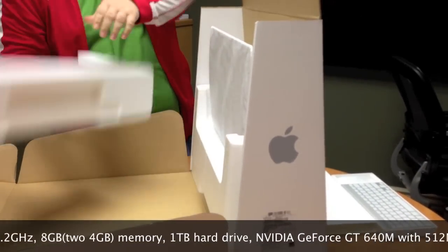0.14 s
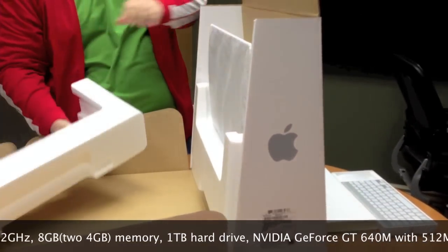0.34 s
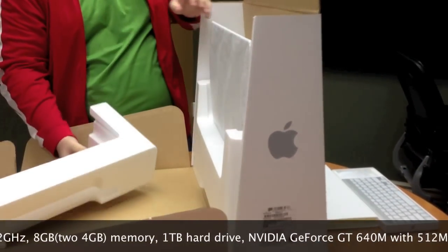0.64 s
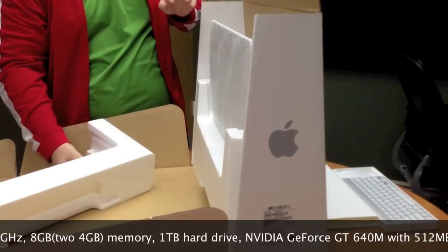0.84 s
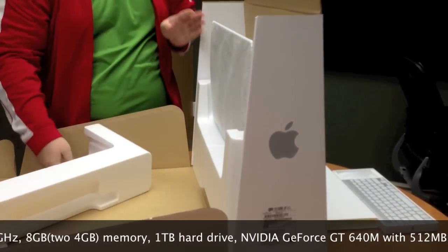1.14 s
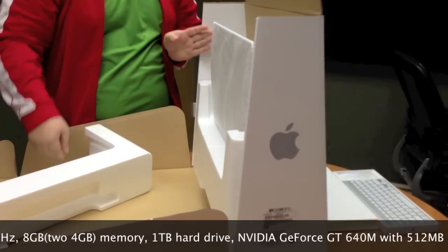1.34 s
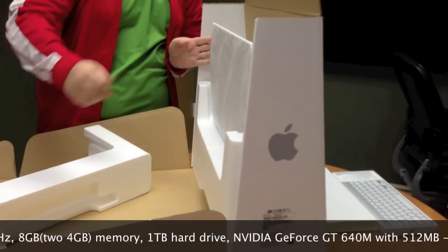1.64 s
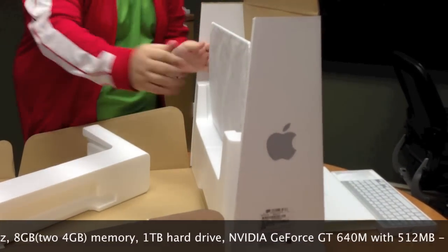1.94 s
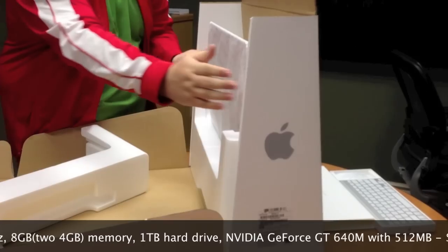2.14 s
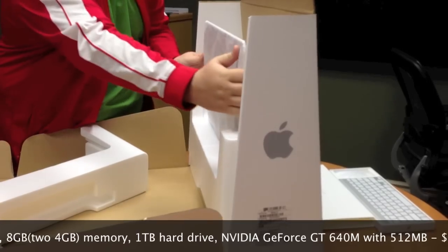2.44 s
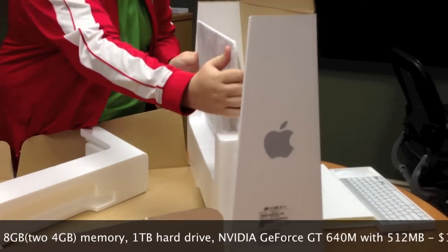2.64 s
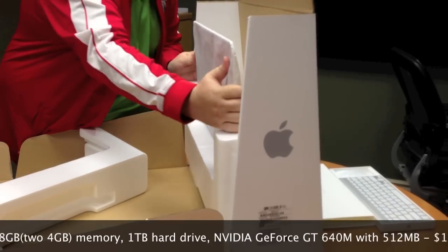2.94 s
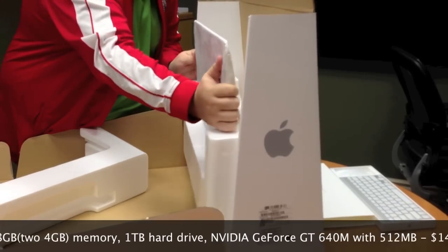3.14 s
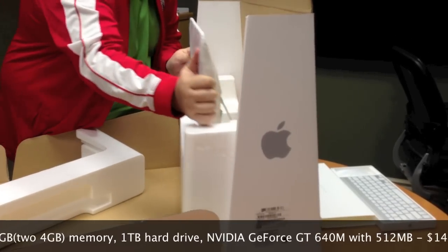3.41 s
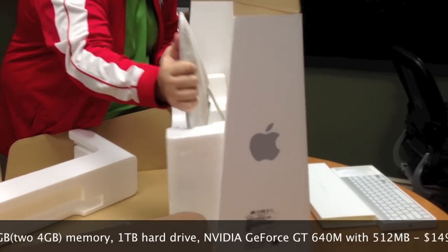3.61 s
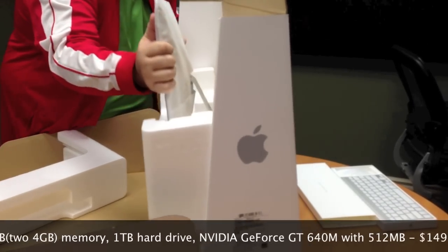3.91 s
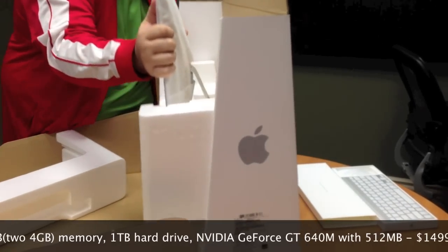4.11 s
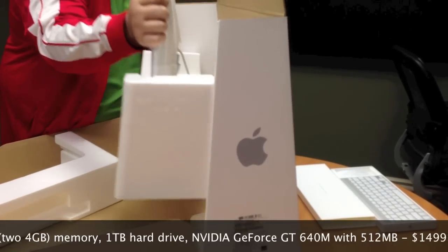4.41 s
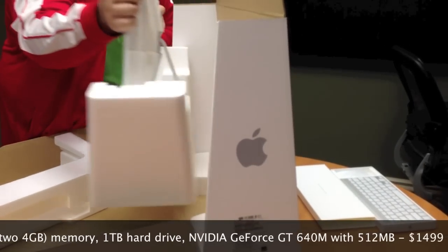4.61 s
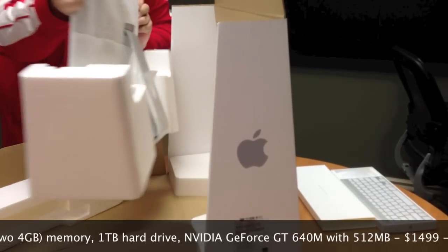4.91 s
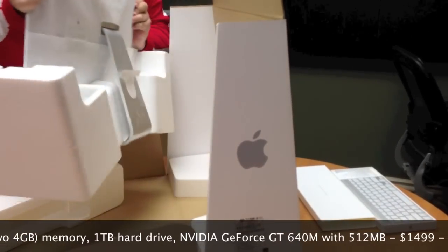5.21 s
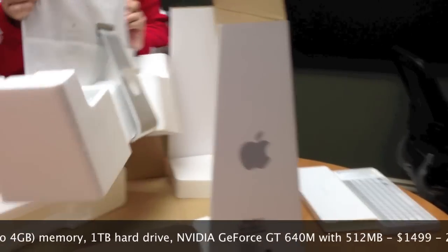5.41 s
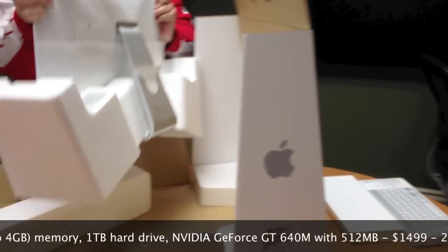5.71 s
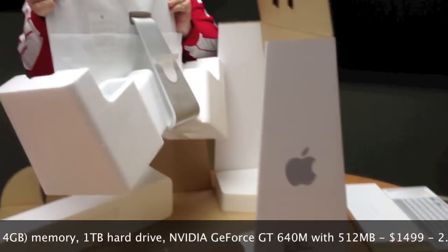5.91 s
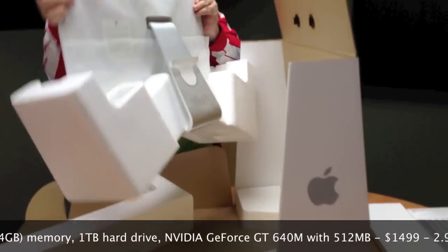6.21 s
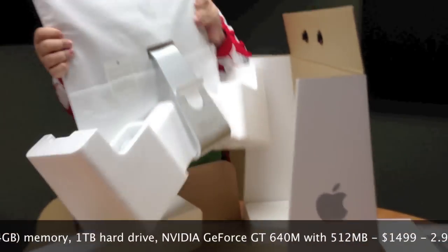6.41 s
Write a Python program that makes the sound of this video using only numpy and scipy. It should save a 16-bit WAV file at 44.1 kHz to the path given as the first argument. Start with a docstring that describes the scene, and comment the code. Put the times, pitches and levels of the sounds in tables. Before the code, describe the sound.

In a quiet room, a foam block drops onto cardboard with a few hollow knocks. Light rubs and small ticks of wrapping follow, then one loud bump on the carton. Foam packing slides out along the box wall in a long, grainy hiss with faint squeaks and sudden jerks. Shorter scrapes and soft bumps finish the unpacking. The sound is fairly close, with little echo.

```python
"""Foam slides along a carton wall: a dense hiss of tiny slips, with faint squeaks and a few sudden jerks.
A heavy object is being unpacked on a table in a quiet room, in short rubs and one long pull.
Foam blocks drop on the cardboard and bump the carton, ringing its hollow modes,
and the foam and a wrapping sheet tick. A short room tail and a steady hush sit behind it all."""
import sys
import numpy as np
from scipy import signal
from scipy.fft import rfft, irfft, next_fast_len
from scipy.io import wavfile
from scipy.ndimage import uniform_filter1d, map_coordinates

SR = 44100
rng = np.random.default_rng(int(sys.argv[2]) if len(sys.argv) > 2 else 0)


def persist_wave(psi):
    """Save psi, clipped to +-1, as 16-bit WAV."""
    counts = np.round(np.clip(psi, -1, 1) * 32767).astype(np.int16)
    wavfile.write(sys.argv[1], SR, np.atleast_2d(counts).T)


N = 288855


def amp(db):
    """Gain of a level in dB."""
    return 10 ** (np.asarray(db) / 20)


def unit(x):
    """x at rms 1."""
    return x / np.sqrt(np.mean(x ** 2) + 1e-20)


def along(points, hz):
    """Read a curve of (frequency, value) points on a log frequency axis."""
    point_hz, values = np.transpose(points)
    return np.interp(np.log(hz + 1), np.log(point_hz + 1), values)


def wobble(rate):
    """A smooth random modulator, rate knots a second."""
    knots = rng.standard_normal(int(N * rate / SR) + 4)
    return map_coordinates(knots, [np.arange(N) * rate / SR])


def filtered(x, response):
    """x through an EQ given as complex gain against frequency."""
    size = next_fast_len(len(x) + SR // 4)
    return irfft(rfft(x, size) * response(np.fft.rfftfreq(size, 1 / SR)), size)[:len(x)]


def lowpass(x, cutoff_hz, order):
    """Roll off the top end without shifting phase."""
    return filtered(x, lambda hz: 1 / (1 + (hz / cutoff_hz) ** order))


def resonances(modes):
    """Response of a resonator bank of alternating polarity: (pitch [Hz], width [Hz], level [dB])."""
    return lambda hz: sum((-1) ** k * amp(db) * 1j * hz * width / (pitch**2 - hz**2 + 1j * hz * width)
                          for k, (pitch, width, db) in enumerate(modes))


# Tone of the hush: (frequency [Hz], relative level [dB])
HUSH_EQ = [(15, -68), (25, -17), (64, -26), (152, 1), (246, -2), (537, -6), (804, -3), (1050, -5.5),
           (4500, -10.5), (13600, -9.5), (15500, -11)]
def hush(level_db=-68.5):
    """The bed: steady noise of the room and the microphone."""
    return amp(level_db) * unit(filtered(rng.standard_normal(N), lambda hz: amp(along(HUSH_EQ, hz))))


# Reverb time of the room: (frequency [Hz], t60 [s])
ROOM_DECAY = [(150, 0.78), (600, 0.25), (3000, 0.085), (12000, 0.33)]
def room(x):
    """The room's tail after a short pre-delay; each frequency dies at its own speed."""
    hz, t, spectrum = signal.stft(rng.standard_normal(SR // 2), SR, nperseg=256)
    decay = amp(-60 * t / along(ROOM_DECAY, hz)[:, None])
    tail = signal.istft(spectrum * decay, SR, nperseg=256)[1]
    return signal.fftconvolve(np.pad(x, (200, 0)), tail / np.linalg.norm(tail))[:N]


# Ticks of foam and wrapping: (time [s], peak before the low-pass [dB], pitch [Hz], t60 [s])
WRAPPING_TICKS = [(.384, -24, 4700, 0.046), (0.5536, -58, 4473, 0.06), (0.5856, -42, 5390, 0.06),
                  (0.7015, -54, 4120, 0.06), (0.9682, -41.5, 3300, 0.073), (1.0825, -34.5, 6200, 0.098),
                  (1.836, -33.5, 7300, 0.071), (1.3299, -57, 2130, 0.066), (1.497, -51.5, 5740, 0.06),
                  (1.507, -40.5, 2170, 0.055), (1.6033, -51, 3420, 0.06), (1.6392, -58, 5850, 0.06),
                  (1.7272, -47.5, 2190, 0.15), (1.836, -31, 3800, 0.1), (1.944, -55, 2090, 0.066),
                  (2.0359, -45, 2040, 0.041), (2.0857, -47, 3100, 0.079), (2.1779, -53, 3750, 0.06),
                  (3.489, -23, 5450, .04), (3.593, -24, 4660, 0.052), (3.684, -30.5, 4670, 0.06)]
def ticks():
    """Each tick is a snap ringing briefly at its own pitch over a broad click."""
    out, t = np.zeros(N + SR), np.arange(SR // 4) / SR
    for start, db, hz, t60 in WRAPPING_TICKS:
        force = rng.standard_normal(len(t)) * (amp(-60 * t / 0.012) + 0.38 * amp(-60 * t / t60))
        snap = filtered(force, resonances([(hz, 0.11 * hz, 0), (4500, 5000, -14)]))
        out[round(start * SR):][:len(t)] += amp(db) * snap / np.abs(snap).max()
    return lowpass(out[:N], cutoff_hz=8170, order=12)  # the wrapping sounds dull above this


# Hollow body of the carton: (pitch [Hz], width [Hz], relative level [dB])
CARTON_MODES = [(168, 24, 2), (243.8, 34, 5.5), (361.4, 105, 2.5), (432, 62, 4), (548, 43, 1), (680, 49, 3),
                (890, 350, 0.5), (1430, 250, -3), (1945, 400, -42.5)]
# Tone of the contact crack: (frequency [Hz], relative level [dB])
CRACK_EQ = [(600, -9.5), (1500, 8), (3000, 2), (5000, 3.5), (9000, -14.5), (15000, -39.5)]
# Blows on the carton: (time [s], body peak [dB], crack over body [dB], rattle t60 [s],
# hardness [dB/octave], pitch favoured by the spot struck [Hz], rattle over blow [dB])
CARTON_KNOCKS = [(0.3802, -21.5, -12, 0.23, -4, 730, -9), (0.4164, -28.5, -6, 0.23, -8, 800, -12.5),
                 (.449, -35.5, -20, 0.26, -7.5, 280, -15), (0.505, -35.5, -17, 0.32, -8, 395, -13),
                 (.534, -43.5, -29, 0.22, -8, 330, -8), (0.617, -42.5, -14, 0.27, -11, 252, -8),
                 (0.8017, -27.5, -4, 0.31, 0, 392, -5), (0.85, -41, -2.5, 0.2, -16, 400, -2),
                 (.942, -50.5, -23, 0.22, -8, 450, -6), (.968, -47, -5.5, 0.24, -5, 310, -3),
                 (1.132, -47, -15, 0.15, -8, 378, -5), (2.397, -57.5, -12.5, 0.93, -4, 550, -1),
                 (2.867, -55, -26, 0.57, -0.5, 397, -10), (2.939, -15.5, -21, 0.27, -2, 587, -13.5),
                 (3.502, -48, -11.5, 0.26, -18, 245, -6), (3.712, -47.5, -25, 0.34, -9, 195, -3),
                 (4.977, -48.5, -21, 0.36, -3.5, 168, -3), (5.358, -50.5, -20, 0.32, 4.5, 407, -3),
                 (5.506, -41.5, -12, 0.38, -1, 190, -4), (5.622, -49, -18, 0.26, -3, 250, -10)]
def knocks():
    """A blow and its rattle ring the carton, hard blows brighter; a brief crack marks the contact."""
    out, t = np.zeros(N + SR), np.arange(SR // 2) / SR
    mode_hz, width, mode_db = np.transpose(CARTON_MODES)
    for start, db, crack_db, t60, hardness, spot_hz, rattle_db in CARTON_KNOCKS:
        body_noise, crack_noise = rng.standard_normal((2, len(t)))
        blow = amp(-60 * t / 0.021)
        rattle = amp(rattle_db - 60 * t / t60)
        # modes that bulge under the blow ring most
        spot_db = 11 * np.exp(-(np.log2(mode_hz / spot_hz) / 0.54) ** 2)
        struck_db = mode_db + hardness * np.log2(mode_hz / 400) + spot_db
        carton = resonances(np.transpose([mode_hz, width, struck_db]))
        body = filtered(body_noise * (blow + rattle), carton)
        crack = unit(filtered(crack_noise, lambda hz: amp(along(CRACK_EQ, hz))))
        crack *= amp(-60 * t / 0.024) + 0.26 * amp(-60 * t / (0.74 * t60))
        out[round(start * SR):][:len(t)] += amp(db) * (body / np.abs(body).max() + amp(crack_db) * crack)
    return out[:N]


def slip_tone(length, first_hz, last_hz, smear_hz):
    """A swelling tone that glides with the slip rate; uneven slips blur its pitch."""
    progress = np.arange(round(length * SR)) / (length * SR)
    uneven = lowpass(rng.standard_normal(SR // 2), smear_hz, order=2)[:len(progress)]
    phase = 2 * np.pi * np.cumsum(first_hz + (last_hz - first_hz) * progress) / SR
    return np.sin(np.pi * progress) ** 0.26 * np.sin(phase) * unit(uneven)


# Foam squeaks: (time [s], length [s], start pitch [Hz], end pitch [Hz], level [dB])
FOAM_SQUEAKS = [(0.025, 0.26, 1710, 1675, -64.5), (1.497, 0.029, 840, 838, -62),
                (1.79, 0.052, 2240, 2170, -55.5), (2.544, 0.17, 697, 688, -65),
                (3.24, 0.09, 2240, 2200, -54), (3.304, 0.17, 5870, 5660, -43),
                (3.246, 0.33, 4350, 4200, -48.5), (3.702, 0.21, 4540, 4550, -51),
                (3.949, 0.184, 4360, 4500, -56), (4.1, 0.3, 6300, 5900, -51.5),
                (5.075, 0.025, 2220, 2200, -65), (5.708, 0.037, 4670, 4850, -49.5),
                (5.706, 0.022, 3700, 3750, -49)]
def squeaks():
    """A patch of foam slips almost evenly: a faint fuzzy tone riding on the hiss."""
    out = np.zeros(N)
    for start, length, first_hz, last_hz, db in FOAM_SQUEAKS:
        tone = slip_tone(length, first_hz, last_hz, smear_hz=90 + 0.012 * first_hz)
        out[round(start * SR):][:len(tone)] += amp(db) * tone
    return out


# Broad tone of rubbed foam: (frequency [Hz], gain [dB])
FOAM_EQ = [(410, -30), (700, -14.5), (1060, -16), (1250, -8.5), (1670, -9), (3270, -2), (5500, 2),
           (8660, -4.5), (13300, -4.5), (14700, -10), (15500, -39.5)]
# Body modes of the foam: (pitch [Hz], width [Hz], boost at ring = 1 [dB])
FOAM_PEAKS = [(2300, 204, 3), (3710, 230, 2.5), (4240, 220, 4.5), (4650, 130, 4.5), (5400, 67, -4),
              (6370, 370, 2.5), (7240, 610, 3.5), (7880, 66, 10), (10050, 250, 4), (11380, 300, 6.5)]
def foam_colour(x, ring):
    """Give x the foam's tone and body modes; ring says how freely the modes sound."""
    def response(hz):
        boost_db = sum(db / (1 + (2 * (hz - pitch) / width) ** 2) for pitch, width, db in FOAM_PEAKS)
        return amp(along(FOAM_EQ, hz) + ring * boost_db)
    return filtered(x, response)


# The foam lets go: (time [s], length [s], start pitch [Hz], end pitch [Hz],
# squeal before EQ [dB], hiss before EQ [dB])
FOAM_JERKS = [(3.483, 0.042, 14000, 1007, -24, -40), (3.498, 0.048, 5510, 4580, -35, -24.5),
              (3.587, 0.035, 5000, 3770, -36.5, -25.5), (3.67, 0.026, 5500, 4590, -43, -34.5),
              (5.94, .045, 3800, 6510, -58, -51), (6.349, 0.063, 3060, 7500, -60, -56)]
def jerks():
    """The slip rate sweeps as the foam brakes or speeds up: a rough squeal in a burst of duller hiss."""
    squeals, bursts = np.zeros((2, N))
    for start, length, first_hz, last_hz, squeal_db, hiss_db in FOAM_JERKS:
        squeal = slip_tone(length, first_hz, last_hz, smear_hz=900)
        swell = np.sin(np.linspace(0, np.pi, len(squeal)))
        hiss = rng.standard_normal(SR // 4)[:len(squeal)]
        squeals[round(start * SR):][:len(squeal)] += amp(squeal_db) * squeal
        bursts[round(start * SR):][:len(squeal)] += amp(hiss_db) * swell * hiss
    return foam_colour(squeals + lowpass(bursts, cutoff_hz=9000, order=3), ring=1.3)


def slips(scatter_db, patchy_db):
    """Friction grain: a tiny slip at every sample; narrow patches of pitch swell as foam beads catch."""
    grains = rng.standard_normal(N) * amp(scatter_db * wobble(1800))
    spectrum = signal.stft(grains, nperseg=1024)[2]
    patches = uniform_filter1d(rng.standard_normal(spectrum.shape), 3, axis=0)  # smooth across pitch
    patches = uniform_filter1d(patches, 5, axis=1)  # and across time
    return signal.istft(spectrum * amp(patchy_db * unit(patches)), nperseg=1024)[1][:N]


# Fader points of the long pull out of the carton:
# (time [s], hiss [dB], treble over hiss [dB], low band over hiss [dB], carton rumble [dB])
LONG_PULL = [(3.18, -76, -4, -9, -95), (3.246, -44.5, -11, -14.5, -72), (3.39, -47, -4, -15.5, -73),
             (3.475, -41.5, 0.5, -15.5, -64), (3.56, -41, -14, -16, -62.5), (3.64, -44, -14.5, -8, -60),
             (3.84, -46, -6.5, -10, -64), (3.91, -43.5, -4, -15.5, -76), (4.166, -41, -6.5, -13.5, -69),
             (4.52, -48.5, -7.5, -12.5, -71), (4.636, -43.5, -15, -5.5, -68),
             (4.665, -49.5, -17, -6.5, -70), (4.702, -58.5, -13, -7, -76), (4.82, -70.5, -14, -8, -77),
             (4.95, -95, -11, -12, -100)]
# Short rubs: (time at full level [s], hold [s], 20 dB rise [s], 20 dB fall [s],
# hiss [dB], treble over hiss [dB], low band over hiss [dB], carton rumble [dB])
SHORT_RUBS = [(.008, 0.038, 0.025, 0.063, -56, -6, -4, -66), (.12, .15, 0.2, 0.18, -76.5, -2, 6, -76),
              (.45, 0.0081, 0.059, 0.081, -49, -22, -15, -61),
              (0.619, 0.041, 0.16, 0.23, -54, -11, -9.5, -60),
              (0.858, 0.0092, 0.089, 0.11, -51, -9, -5, -48.5),
              (.97, 0.14, 0.036, 0.099, -62, -6, -8.5, -66.5),
              (1.335, 0.018, 0.056, 0.4, -71.5, -10, -3.5, -75.5),
              (1.5, .02, 0.033, 0.17, -63.5, -20, -6, -76), (1.63, 0.039, 0.092, 0.45, -70.5, -18, -7, -81),
              (1.838, 0.013, 0.028, 0.14, -54.5, -28, -10, -71),
              (2.05, 0.25, 0.6, .2, -72.5, -7, -2, -77.5),
              (2.48, 0.011, 0.13, 0.082, -57.5, -10, -3.5, -63),
              (2.55, 0.15, 0.09, .3, -64.5, -12, -4, -74), (2.9, 0.087, 0.2, 0.22, -58, -12, -3, -64),
              (3.11, 0.059, 0.071, 0.092, -51.5, -12.5, -5.5, -65),
              (4.868, 0.0061, 0.11, 0.05, -61.5, -10, -7, -77),
              (4.97, 0.012, 0.078, 0.077, -53, -12, -4.5, -65), (5.08, .02, .1, .1, -66.5, -12, -5.5, -74),
              (5.17, 0.039, 0.077, 0.11, -68.5, -10, 0, -76),
              (5.305, 0.033, 0.035, 0.092, -61.5, -10, -5, -76),
              (5.365, 0.03, 0.047, 0.14, -55.5, -17, -3.5, -65),
              (5.45, 0.062, 0.072, 0.046, -51.5, -7, -10.5, -68),
              (5.55, 0.032, .06, 0.065, -49, -16, -8, -63),
              (5.656, 0.07, 0.067, 0.068, -54, -18, -2.5, -59.5),
              (5.745, 0.044, 0.072, .2, -51, -8.5, -15, -72),
              (5.87, 0.016, 0.12, .12, -56.5, -14.5, 0, -67),
              (5.96, .02, .06, 0.22, -65.5, -9.5, -3, -67.5),
              (6.345, 0.025, 0.064, 0.062, -64, -0.5, 1.5, -68), (6.44, .02, 0.044, .1, -70, -10, 2, -77),
              (6.487, 0.011, 0.062, 0.1, -60, -9, -0.5, -76)]
def strokes():
    """Envelopes of hiss, treble, low band and rumble; overlapping strokes add in power."""
    def band_power(hiss_db, treble_db, low_db, rumble_db):
        return amp([hiss_db, hiss_db + treble_db, hiss_db + low_db, rumble_db]) ** 2
    t = np.arange(N) / SR
    times, *faders = np.transpose(LONG_PULL)
    pulling = (t > times[0]) & (t < times[-1])
    power = band_power(*[np.interp(t, times, fader) for fader in faders]) * pulling
    for full_at, hold, rise, fall, *levels in SHORT_RUBS:
        fade_db = -20 * np.maximum((full_at - t) / rise, (t - full_at - hold) / fall).clip(min=0)
        power += band_power(*levels)[:, None] * amp(fade_db) ** 2
    return np.sqrt(power)


# Tone of the rubbed carton: (frequency [Hz], relative level [dB])
RUMBLE_EQ = [(35, -68.5), (60, -23), (86, -20.5), (181, -6), (297, -7.5), (781, -12.5), (1000, -14.5),
             (1300, -16.5), (2200, -120)]
def sliding():
    """Foam on cardboard: a fluttering hiss in three bands, with the carton shaking underneath."""
    hiss_gain, treble_gain, low_gain, rumble_gain = strokes()
    rub = foam_colour(slips(scatter_db=0.19, patchy_db=2.5), ring=0.43)
    low = lowpass(rub, cutoff_hz=2700, order=6)
    treble = rub - lowpass(rub, cutoff_hz=8500, order=6)
    foam = low_gain * unit(low) + hiss_gain * unit(rub - low - treble) + treble_gain * unit(treble)
    shake = rng.standard_normal(N) * amp(1.1 * wobble(60))
    carton = resonances(CARTON_MODES)
    rumble = filtered(shake, lambda hz: amp(along(RUMBLE_EQ, hz)) * np.abs(carton(hz)) ** 0.097)
    flutter = amp(1.37 * wobble(30))
    return flutter * foam + rumble_gain * unit(rumble)


def scene(reverb_db=-11):
    """The mono mix: accents with a little room on them, the dry sliding foam and the hush."""
    accents = knocks() + ticks() + jerks() + squeaks()
    return (accents + amp(reverb_db) * room(accents) + sliding() + hush())[None]


def record(dry, bass_hz=110, top_hz=15660):
    """The microphone drops the deep bass; the recorder keeps nothing above its band limit."""
    bass_cut = lambda hz: (1j * hz / (1j * hz + bass_hz)) ** 2
    return filtered(dry[0], lambda hz: bass_cut(hz) * (hz < top_hz))[None]


dry = scene()
out = record(dry)
persist_wave(out)
```